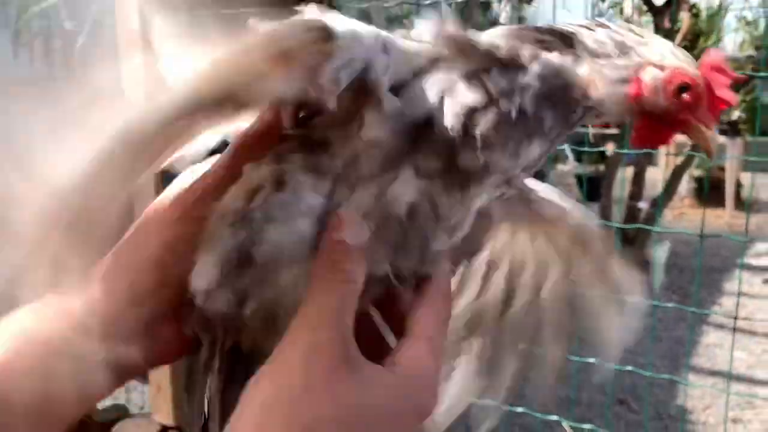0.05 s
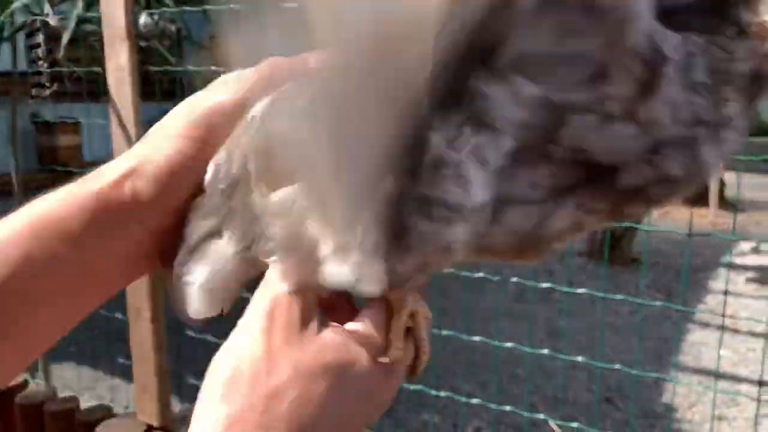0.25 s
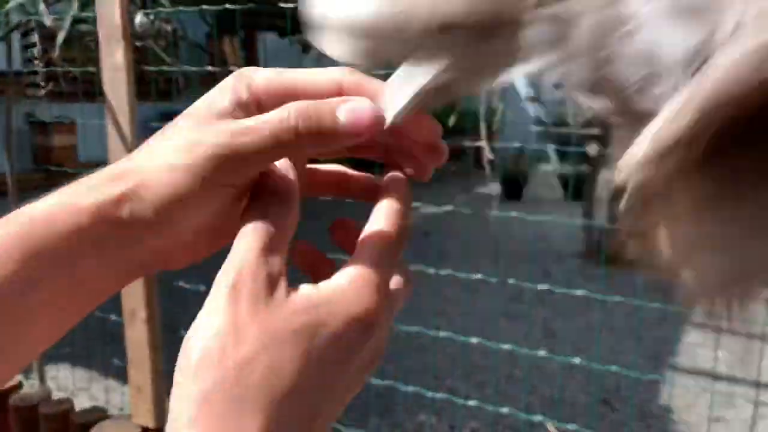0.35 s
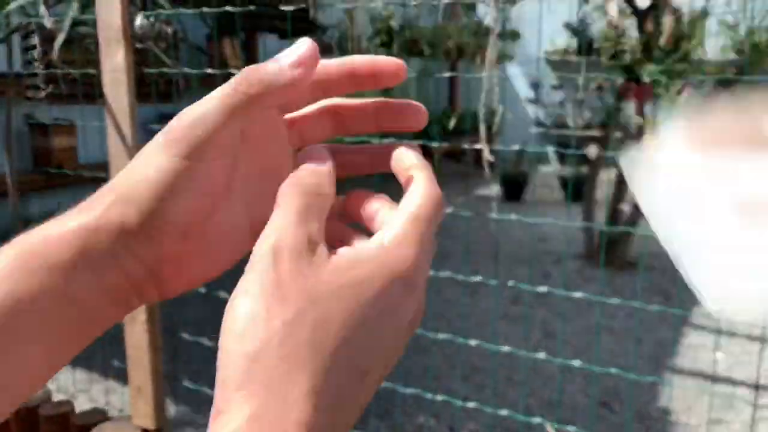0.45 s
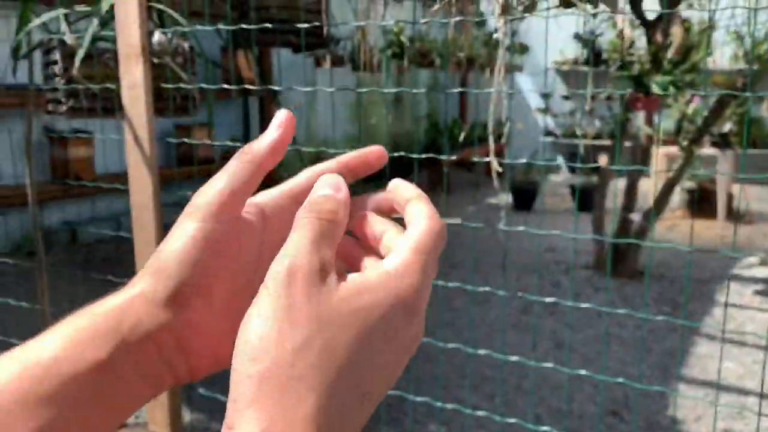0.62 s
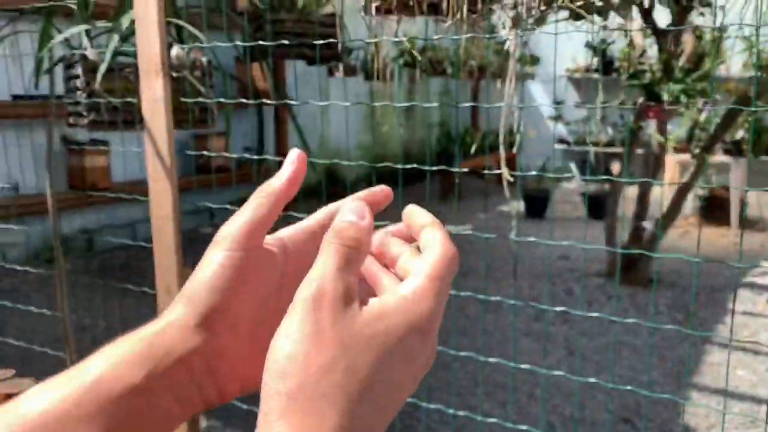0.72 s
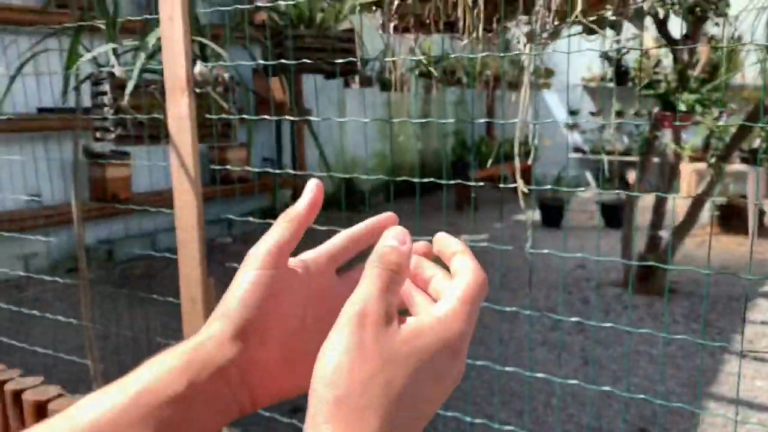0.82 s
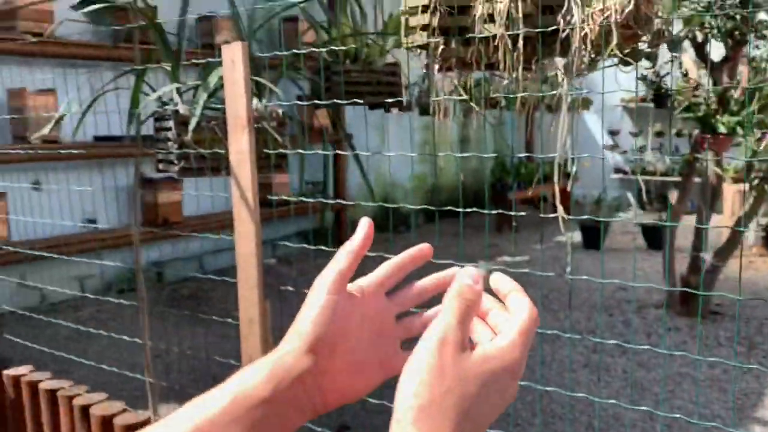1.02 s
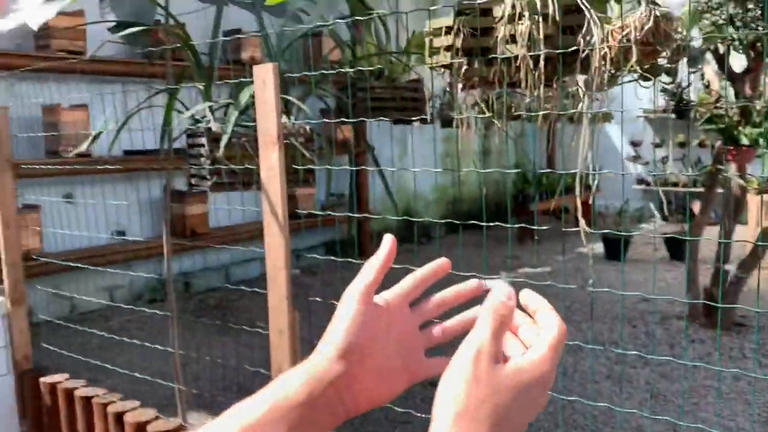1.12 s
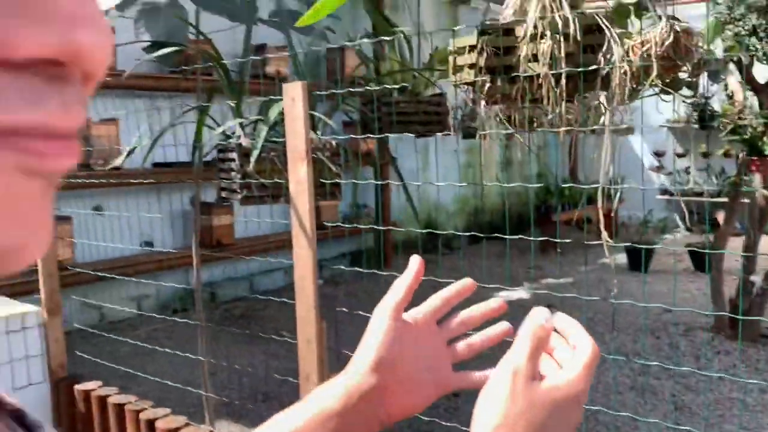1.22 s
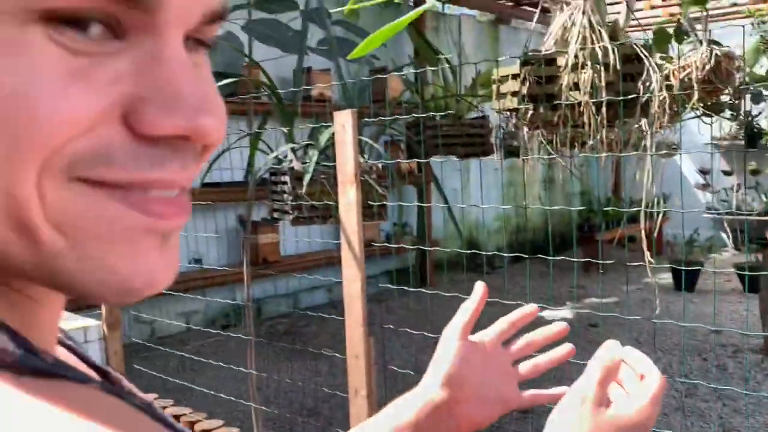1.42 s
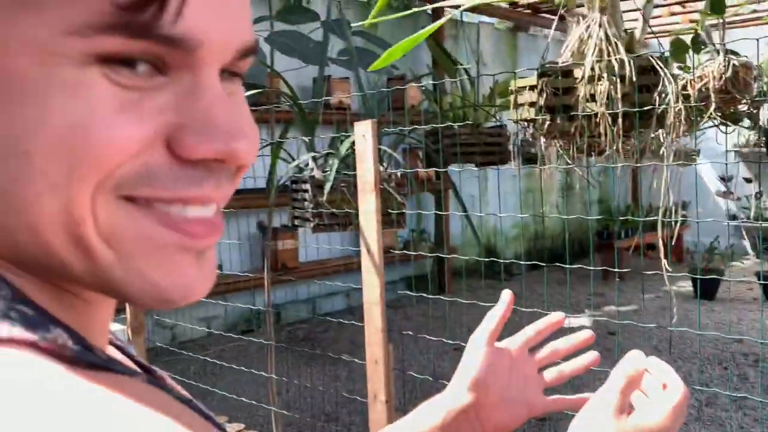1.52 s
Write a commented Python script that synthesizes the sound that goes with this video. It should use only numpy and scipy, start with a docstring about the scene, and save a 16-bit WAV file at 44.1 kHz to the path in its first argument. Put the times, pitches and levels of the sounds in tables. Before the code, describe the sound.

A hen flaps her wings right beside the microphone in a backyard. She gives one clipped squawk, a gust thumps and overloads the microphone, feathers scratch it, and the wingbeats fade with soft claps and two faint clucks.

```python
"""A backyard: a hen beats her way out of two hands right beside a phone and flutters off.
Air rushing through her feathers swishes; the air her wings displace buffets the microphone, and the
strongest gust overloads it. She gives one clipped squawk, a pulse train ringing her throat. Feather
tips scratch the phone by friction. Soft claps and two clucks mark her escape, fences and walls
reflect her sound, and a faint tone wavers far away."""
import sys
import numpy as np
from scipy import signal
from scipy.fft import rfft, irfft
from scipy.io import wavfile
from scipy.ndimage import uniform_filter1d

SR = 44100
rng = np.random.default_rng(int(sys.argv[2]) if len(sys.argv) > 2 else 0)


def bounce(signal):
    """Save signal as a 16-bit WAV file at the path given by the first command-line argument."""
    frames = np.transpose(np.atleast_2d(signal))
    limited = np.clip(frames, -1, 1)
    pcm = np.round(limited * 32767).astype(np.int16)
    wavfile.write(sys.argv[1], SR, pcm)


N = 68355
PORT_LAG_S = 0.00024  # sound from the right reaches the left port later


def undb(db):
    """Decibels to amplitude ratio."""
    return 10 ** (np.asarray(db) / 20)


def unit(x):
    """Normalise to rms 1."""
    return x / np.sqrt(np.mean(x ** 2))


def clock():
    """Time of every sample in seconds."""
    return np.arange(N) / SR


def colour(x, points):
    """Zero-phase filter through (frequency_hz, gain_db) points."""
    hz, db = np.array(points, float).T
    bins_hz = np.maximum(np.fft.rfftfreq(2 * N, 1 / SR), 1)
    gain = undb(np.interp(np.log(bins_hz), np.log(hz), db))
    return irfft(rfft(x, 2 * N) * gain)[..., :N]


def noise(spectrum, correlation):
    """Coloured noise of rms 1, with the given correlation of left and right."""
    mid, side = rng.standard_normal((2, N))
    white = np.sqrt(1 + correlation) * mid + np.sqrt(1 - correlation) * side * np.array([[1], [-1]])
    return unit(colour(white, spectrum))


def walk(rate_hz):
    """Smooth random fluctuation of rms 1."""
    span = max(int(SR / rate_hz), 1)
    return unit(uniform_filter1d(uniform_filter1d(rng.standard_normal(N), span), span))


def swell(middle_s, length_s):
    """Gaussian envelope, about length_s wide at half height."""
    return np.exp(-2 * np.sqrt(2) * ((clock() - middle_s) / length_s) ** 2)


def ports(x, lag_s):
    """Path difference: the left microphone port hears x later by lag_s."""
    t = clock()
    return np.array([np.interp(t - side * lag_s / 2, t, x) for side in (1, -1)])


def yard(level_db=-53.5):
    """Diffuse background: a low rumble, nearly uncorrelated between the ports."""
    spectrum = [(25, -2.5), (60, -0.5), (130, -18), (350, -10), (600, -16.5), (900, -23.5),
                (1400, -25.5), (2200, -35), (5000, -39.5), (8500, -39.5), (15000, -55)]
    return undb(level_db) * noise(spectrum, 0.082)


def barb_catches(per_s=90, decay_s=.0012, spread_db=3):
    """Stick-slip friction: barbs catch and let go, giving a gain with brief, uneven spikes."""
    caught = rng.random(N) < per_s / SR
    size = undb(spread_db * rng.uniform(-1, 1, N))
    spikes = signal.fftconvolve(caught * size, np.exp(-clock() / decay_s))[:N]
    return unit(1 + spikes)


def feather_sliding(x, flicker_db=2):
    """Amplitude modulation: feathers slide over one another, so each band flickers on its own."""
    log_centres = np.log(700 * 2 ** np.arange(0, 4.6, .5))
    log_hz = np.log(np.maximum(np.fft.rfftfreq(N, 1 / SR), 1))
    bands = (irfft(rfft(x) * np.interp(log_hz, log_centres, pick), N)
             for pick in np.eye(len(log_centres)))
    return unit(sum(band * undb(flicker_db * walk(90)) for band in bands))


# Wing strokes: middle_s, length_s, swish_db, flutter_db
WING_STROKES = [(0.05, 0.18, -42.5, -37.5), (0.096, 0.047, -41.5, -25), (0.201, 0.1, -37.5, -31.5),
                (0.294, 0.15, -35.5, -29), (0.346, 0.14, -47.5, -27), (0.444, 0.049, -33, -28.5),
                (0.513, 0.056, -38, -44.5), (0.613, 0.099, -40.5, -43), (0.688, 0.019, -56, -35.5),
                (0.721, 0.064, -39.5, -35), (0.809, .025, -43.5, -43), (0.835, 0.12, -43.5, -42),
                (.945, 0.071, -41.5, -39), (1.059, 0.12, -46, -45.5), (1.152, 0.085, -48, -46),
                (1.22, 0.21, -52, -52.5)]
# Spectra of feather swish and vane flutter: frequency_hz, gain_db
SWISH_SPECTRUM = [(300, 8), (700, 5), (1400, -3), (2200, -3), (4500, -2), (6500, -3), (7400, -6),
                  (8400, -1), (10500, -5.5), (14000, -5), (15300, -40.5)]
FLUTTER_SPECTRUM = [(40, -2.5), (90, 6), (150, -2), (260, -1.5), (400, -13.5), (650, -23.5), (1200, -26.5),
                    (3000, -57.5)]


def wingbeats(dulling_per_s=1.8):
    """Flow noise: each stroke swishes while the vanes flutter low; overlapping strokes add in power."""
    swish = np.sqrt(sum((undb(db) * swell(s, length)) ** 2 for s, length, db, _ in WING_STROKES))
    flutter = np.sqrt(sum((undb(db) * swell(s, length * 0.81)) ** 2 for s, length, _, db in WING_STROKES))
    grain = unit(undb(-0.5 * walk(440) + walk(54))) * barb_catches()
    bright = feather_sliding(noise(SWISH_SPECTRUM, .05))
    dull = colour(bright, [(9000, -2.5), (13000, -11.0)])
    brightness = np.maximum(1.6 - dulling_per_s * clock(), 0)  # the top fades with distance
    feathers = dull + (bright - dull) * brightness
    lean_right = undb([[-0.5], [0.5]])
    return swish * grain * feathers * lean_right + flutter * noise(FLUTTER_SPECTRUM, 1)


# Puffs of air at the microphone: middle_s, length_s, pitch_hz, level_db
AIR_PUFFS = [(0.038, 0.031, 63.5, -25.5), (0.102, 0.061, 72, -31.5), (0.199, 0.03, 58, -28),
             (0.281, 0.013, 93, -18), (0.377, 0.03, 74, -20.5), (0.461, 0.047, 60.9, -19),
             (0.524, 0.12, 66.1, -31), (0.565, 0.033, 51.7, -24), (0.641, 0.045, 59, -32),
             (0.705, 0.042, 77, -29.5), (0.78, 0.028, 67, -29), (0.877, 0.064, 63.6, -39.5),
             (0.984, 0.046, 67, -35), (1.082, 0.038, 70.5, -34), (1.356, 0.058, 64.9, -48),
             (1.44, 0.039, 63.2, -43), (1.497, 0.034, 65.3, -45)]


def puffs(wander=0.15, turbulence_db=-7.5):
    """Near-field flow: air displaced by the wings arrives as slow, uneven swings of pressure."""
    uneven_time = np.cumsum(np.exp(wander * walk(60))) / SR
    pressure = force = 0
    for s, length, hz, db in AIR_PUFFS:
        push = undb(db) * swell(s, length)
        from_middle = uneven_time - np.interp(s, clock(), uneven_time)
        pressure += push * np.sin(2 * np.pi * hz * from_middle)
        force += push
    turbulence = noise([(20, -18.5), (45, -0.5), (90, -8), (180, -13), (400, -32), (1500, -60.5)], 0)
    return ports(pressure, PORT_LAG_S) + undb(turbulence_db) * force * turbulence


# Soft claps, probably her wings: middle_s, length_s, body_db, edge_db
WING_CLAPS = [(0.082, 0.013, -35, -48.5), (0.11, 0.0087, -36, -67), (0.616, 0.023, -36.5, -53),
              (0.885, 0.017, -36.5, -42.5)]
# Spectra of the hollow body and the papery edge: frequency_hz, gain_db
HOLLOW_SPECTRUM = [(300, -21.5), (700, -22), (930, 1.5), (1130, -3), (1280, -4.5), (1370, 10), (1470, -8.5),
                   (1680, -4), (1830, -5.5), (2150, 1.5), (3300, -21.5), (12000, -45.5)]
PAPERY_SPECTRUM = [(800, -19), (2000, 3.5), (2500, -10.5), (3200, 3), (3700, -7.5), (5000, -15),
                   (12000, -41)]


def claps(edge_lead_s=0.022):
    """Soft impact: wings slap air and body off to the right, a papery edge ahead of a hollow burst."""
    body = sum(undb(db) * swell(s, length) for s, length, db, _ in WING_CLAPS)
    edge = sum(undb(db) * swell(s - edge_lead_s, length) for s, length, _, db in WING_CLAPS)
    slaps = body * noise(HOLLOW_SPECTRUM, 1)[0] + edge * noise(PAPERY_SPECTRUM, 1)[0]
    grain = unit(undb(0.83 * walk(500)))
    return ports(slaps * grain, lag_s=0.00022)


def echo(x, t60_s=0.69, level_db=-18, delay_s=.008):
    """Reverberation: fences and walls return a thin, dull tail that decays exponentially."""
    decay = undb(-60 * clock() / t60_s) * (clock() > delay_s)
    tail = noise([(100, -17.5), (500, 8.5), (3000, -5.5), (12000, -9.5)], 0) * decay
    tail /= np.sqrt(np.sum(tail ** 2) / 2)
    return undb(level_db) * signal.fftconvolve(x, tail, axes=1)[:, :N]


# Course of the squawk: time_s, pitch_hz, relative_level_db, hoarseness_db
SQUAWK_CONTOUR = [(.1862, 590, -26, -16), (.190, 635, -19, -13), (.1965, 655, -15, -11),
                  (.1985, 570, -20, -9), (.201, 545, -17.5, -9), (.2085, 410, -17.5, -8),
                  (.213, 400, -29, -4), (.224, 400, -39, 0)]
# Throat resonances: start_hz, end_hz, bandwidth_hz, gain_db
FORMANTS = [(630, 710, 130, 0.5), (1219, 1060, 130, 3.5), (1400, 1470, 130, 5.5), (1873, 1860, 87, 4.5),
            (2560, 2840, 81, 13), (2840, 2800, 100, 11.5), (3930, 2900, 250, -3)]
# Spectrum of the hoarse noise: frequency_hz, gain_db
HOARSE_SPECTRUM = [(300, -12.5), (1200, 5.5), (3000, 8.5), (4500, -0.5), (6500, -21), (8200, -20),
                   (14000, -36)]


def squawk(jitter=.01, shimmer_db=1.5, glide_span_s=(.196, .202), gain_db=-2):
    """Source and filter: pulses ring the moving throat; the note rises, then falls and turns hoarse."""
    t = clock()
    s, hz, db, hoarse_db = np.array(SQUAWK_CONTOUR).T
    cycles = np.cumsum(np.interp(t, s, hz) * (1 + jitter * walk(600))) / SR
    pulses = np.diff(np.floor(cycles), prepend=0) * undb(shimmer_db * walk(600))
    voice = 0
    for start_hz, end_hz, bandwidth, formant_db in FORMANTS:
        formant_hz = np.interp(t, glide_span_s, (start_hz, end_hz))
        phasor = np.exp(2j * np.pi * np.cumsum(formant_hz) / SR)
        decay = bandwidth * np.exp(-np.pi * bandwidth * t[:SR // 20])
        ring = phasor * signal.fftconvolve(pulses / phasor, decay)[:N]  # a gliding resonator
        voice += undb(formant_db) * ring.imag
    voice = unit(colour(voice, [(150, -27.5), (450, -5)]))
    rasp = undb(np.interp(t, s, hoarse_db)) * noise(HOARSE_SPECTRUM, 0)
    return undb(gain_db + np.interp(t, s, db, left=-120, right=-120)) * (voice + rasp)


# Vortices at the microphone: start_s, start_hz, slowing_s, rise_s, level_db, sharpness, left_lead_s
WING_VORTICES = [(0.2334, 130.7, 0.011, 0.015, -6, 2.7, 0.0011),
                 (.315, 522.5, .0058, 0.0097, 2.5, 1.17, .00022)]
# Spectrum of their eddies: frequency_hz, gain_db
EDDY_SPECTRUM = [(50, -32), (150, 18), (350, 3), (520, 9), (680, -1.5), (1050, -3), (1400, -9),
                 (2500, -19.5), (6000, -33), (14000, -53)]


def vortices(end_hz=45.33, churn_db=-10, eddy_db=-17):
    """Vortex shedding: a passing wing brings suction, then swings that slow and die amid eddies."""
    eddies = undb(eddy_db) * noise(EDDY_SPECTRUM, 0.8)
    churn = undb(churn_db) * noise([(20, 15), (70, 2.5), (150, -20.5), (600, -36)], -0.7)
    pressure = 0
    for s, start_hz, slowing, rise, db, sharpness, lead in WING_VORTICES:
        age = np.maximum(clock() - s, 0)
        cycles = end_hz * age + (start_hz - end_hz) * slowing * (1 - np.exp(-age / slowing))
        force = undb(db) * (age / rise * np.exp(1 - age / rise)) ** sharpness
        swing = -force * np.sin(2 * np.pi * cycles)
        pressure += ports(swing, -lead) + force ** 2 * churn + force ** 3 * eddies
    return pressure


# Feather tips touching the phone: peak_s, decay_s, scratch_db, whistle_db
TIP_TOUCHES = [(0.3154, 0.0027, -18, -24), (0.3187, 0.0017, -14, -10.5), (0.3213, 0.0014, -20, -18),
               (0.4263, 0.002, -26.5, -36), (0.4314, 0.0027, -24.5, -34.5), (0.4337, 0.00092, -11, -31),
               (0.435, 0.0031, -13, -18), (0.4393, 0.0022, -17.5, -16), (0.444, 0.015, -35, -39.5),
               (0.4543, 0.00087, -19, -40)]
# Spectra of the scratch, the port's whistle and the left port's shading: frequency_hz, gain_db
SCRATCH_SPECTRUM = [(1000, -11.5), (2300, -8), (2900, -26.5), (3500, 1.5), (4300, -5), (6500, 5),
                    (7200, -15.5), (7800, -22.5), (8200, 2.5), (9000, 4.5), (10800, 1), (13500, -8.5),
                    (16000, -33.5)]
WHISTLE_SPECTRUM = [(2000, -62), (7400, -55.5), (8000, 0.5), (8200, 12.5), (8600, -12), (9500, -26),
                    (16000, -60)]
LEFT_SHADING = [(3000, 2), (5500, -9.5), (6600, 1.5), (8300, -17.5), (10000, -11.5), (12500, -7),
                (16000, 3)]


def brushes(rise_s=.00025):
    """Friction and resonance: feather tips flick across the right port and make it whistle."""
    t = clock()
    scratch = whistle = 0
    for s, decay, scratch_db, whistle_db in TIP_TOUCHES:
        touch = np.exp(np.minimum((t - s) / rise_s, (s - t) / decay))
        scratch += undb(scratch_db) * touch
        whistle += undb(whistle_db) * touch
    grain = unit(undb(2 * walk(2500)))
    friction = scratch * grain * noise(SCRATCH_SPECTRUM, 0.039)
    left, right = friction + whistle * noise(WHISTLE_SPECTRUM, 0.17)
    return np.array([colour(left, LEFT_SHADING), right])


# Spectrum of the quill's knock: frequency_hz, gain_db
KNOCK_SPECTRUM = [(900, -1), (2300, 0), (3200, -23)]


def knock(start_s=.4393, decay_s=.003, level_db=-20.5):
    """Damped impact: a stiff quill strikes the phone among the brushing tips."""
    age = clock() - start_s
    return undb(level_db) * (age > 0) * np.exp(-np.abs(age) / decay_s) * noise(KNOCK_SPECTRUM, 0.73)


# Parting clucks: middle_s, length_s, pitch_hz, level_db
SOFT_CLUCKS = [(0.872, 0.02, 465.8, -40.5), (1.024, 0.013, 452, -36)]


def clucks(jitter=.035, husk_db=-3, harmonics_db=(-16, -8.5, 1, 0.5)):
    """Harmonic series: two soft, husky notes, strongest in the third harmonic."""
    uneven_time = np.cumsum(1 + jitter * walk(560)) / SR
    husk = undb(husk_db) * noise(HOLLOW_SPECTRUM, 1)[0]
    notes = 0
    for s, length, hz, db in SOFT_CLUCKS:
        phase = 2 * np.pi * hz * uneven_time
        voice = sum(gain * np.sin(k * phase) for k, gain in enumerate(undb(harmonics_db), 1))
        notes += undb(db) * swell(s, length) * (voice + husk)
    return ports(notes, PORT_LAG_S)


# Course of a distant note, perhaps another fowl: time_s, pitch_hz, level_db
FAR_CONTOUR = [(1.02, 635, -57), (1.09, 622, -58.5), (1.199, 600, -60), (1.27, 605, -67.5),
               (1.35, 619, -51.5), (1.389, 632, -73), (1.45, 650.5, -60), (1.52, 644, -85.5)]


def far_tone(waver=.014):
    """Random modulation: a faint pure tone from beyond the yard wavers in pitch and level."""
    s, hz, db = np.array(FAR_CONTOUR).T
    pitch_hz = np.interp(clock(), s, hz) * (1 + waver * walk(60))
    level_db = np.interp(clock(), s, db, left=-120, right=-120) + 2 * walk(23)
    return undb(level_db) * np.sin(2 * np.pi * np.cumsum(pitch_hz) / SR)


def scene():
    """Superposition: the hen and her echo, contact and wind at the phone, and the background."""
    hen = wingbeats() + squawk() + claps() + clucks()
    return hen + echo(hen) + brushes() + knock() + puffs() + vortices() + far_tone() + yard()


def record(dry, ceiling=.97, cutoff_hz=16300):
    """Saturation: the microphone rounds off the strongest gust; a low-pass filter cuts the top."""
    rounded = dry / (1 + np.abs(dry / ceiling) ** 3) ** (1 / 3)
    low_pass = signal.ellip(8, .2, 70, cutoff_hz, fs=SR, output="sos")
    return signal.sosfilt(low_pass, rounded)


dry = scene()
out = record(dry)
bounce(out)
```